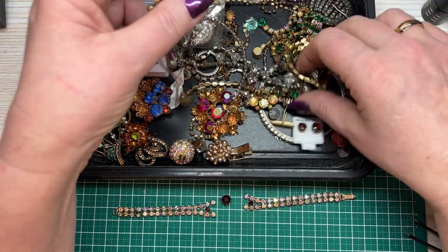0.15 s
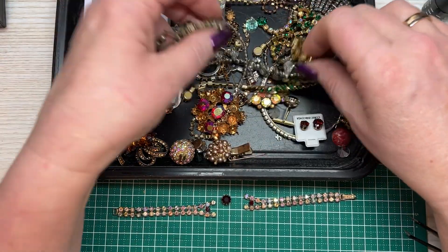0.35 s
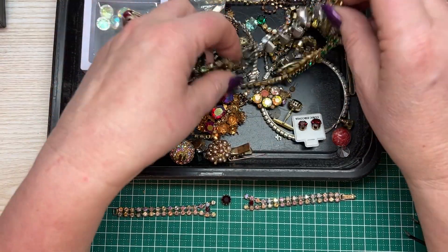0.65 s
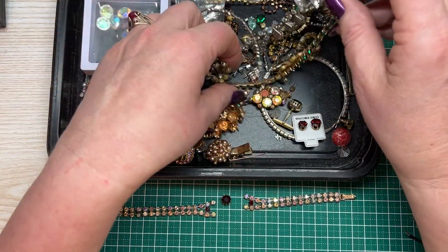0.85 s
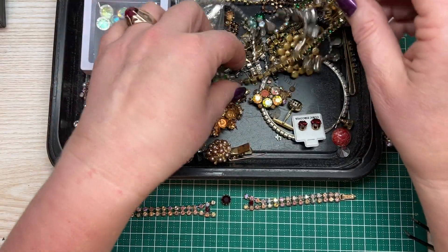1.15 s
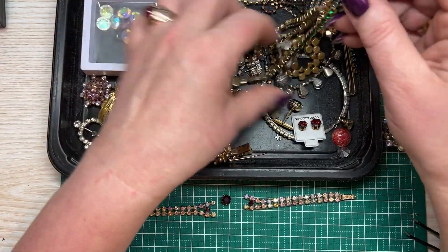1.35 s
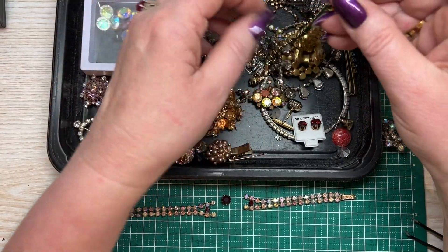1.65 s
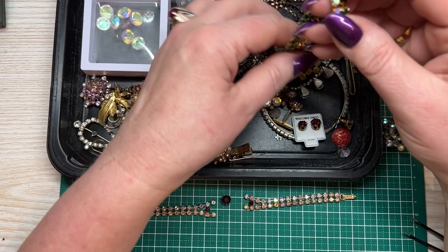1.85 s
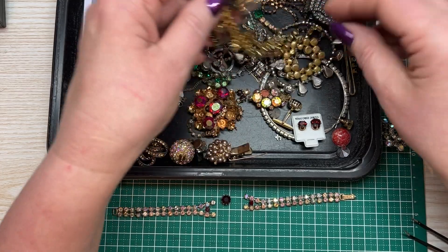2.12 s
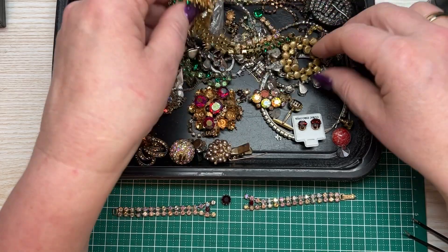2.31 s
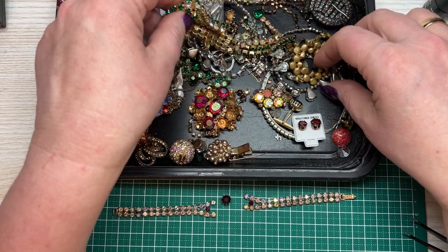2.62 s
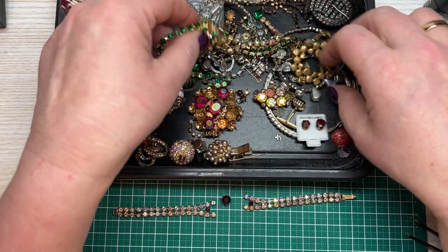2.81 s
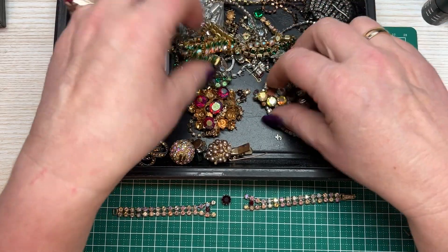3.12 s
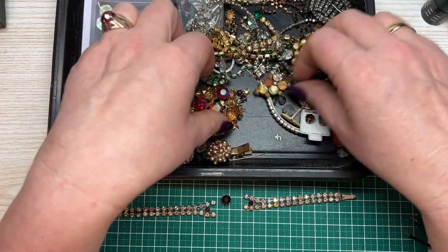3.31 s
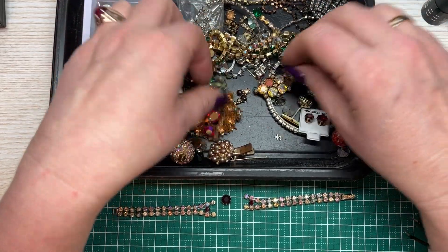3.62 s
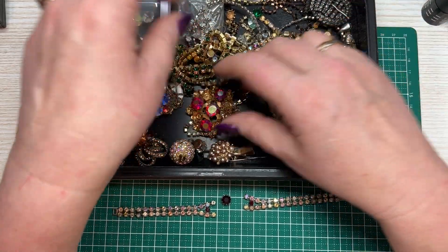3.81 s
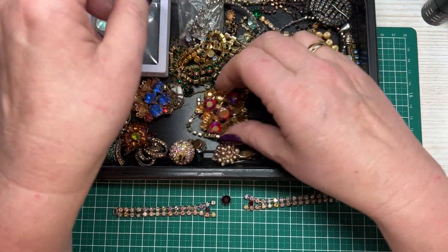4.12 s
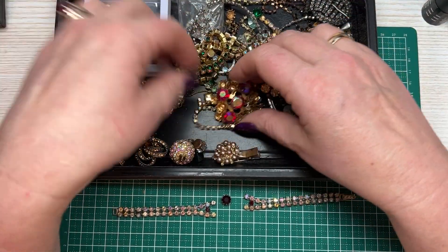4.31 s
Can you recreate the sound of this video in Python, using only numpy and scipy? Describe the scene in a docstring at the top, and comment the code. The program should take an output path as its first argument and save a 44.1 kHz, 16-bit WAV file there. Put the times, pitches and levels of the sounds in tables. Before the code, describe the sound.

Close, dry metallic rattling and clinking in uneven bursts as fingers dig through a heap of brooches, beads and fine chains indoors.

```python
"""Beads and brooches clack as two hands dig through a shallow tray of costume jewelry in a small room:
choked modal impacts sound clear contacts, and random collisions through similar impacts sound the heap.
Chains trickle as denser, brighter collisions, a fine strand as sparser, still brighter ones, and charms
jingle as short sine modes. The tray thuds on the table as a bank of low modes. Two close microphone ports
hear the direct sound with a phase difference, over a short diffuse tail and faint steady noise."""
import sys
import numpy as np
from scipy import signal
from scipy.fft import rfft, irfft, next_fast_len
from scipy.io import wavfile

SR = 44100
rng = np.random.default_rng(int(sys.argv[2]) if len(sys.argv) > 2 else 0)


def wrap_up_sound(samples):
    """Save the sound to the file named by the first command line argument, as 16-bit audio."""
    columns = np.atleast_2d(samples).T
    # keep every value between -1 and 1, then stretch to whole-number steps
    tamed = np.clip(columns, -1, 1)
    steps = np.round(tamed * 32767).astype(np.int16)
    wavfile.write(sys.argv[1], SR, steps)


N = 196641
TIME = np.arange(N) / SR

# Steady noise of the still room: (frequency [Hz], relative spectral level [dB])
AIR_SPECTRUM = [(18, -29), (30, 25), (1070, 16), (2680, -30), (3580, -48), (6050, -72), (7670, -26),
                (10200, -80), (16000, -23)]
# Phase lead of the left port, negative where it lags: (frequency [Hz], phase before bass taper [rad])
PORT_PHASE_LEAD = [(0, 0), (860, -0.7), (1290, -0.8), (2760, 2.7), (3620, 0.9), (4480, 1.7), (5340, 2.1),
                   (7670, 6.0), (8530, 6.7), (9820, 9.1), (10900, 9.8), (12200, 12.5), (13000, 12.8),
                   (14600, 15.6), (15700, 16.5), (16400, 16.1)]
# Modes of the loaded tray on the table:
# (nominal frequency [Hz], nominal relative level [dB], 60 dB decay time [s])
TRAY_MODES = [(63.5, 6.5, 0.29), (76, -5, 0.15), (121.9, 5, 0.17), (151.5, -1.5, 0.12), (169, 3, 0.076),
              (222, -2.5, 0.12), (253, -4.5, 0.056), (322, -3.5, 0.072), (377.7, 1.5, 0.043),
              (426, 5, 0.06), (494, 4, 0.03), (703, 12, 0.03)]
# Pushes and drops that reach the tray: (time [s], relative level [dB], centre of the thud [Hz])
TRAY_KNOCKS = [(0.064, -45.5, 230), (0.095, -51, 215), (0.191, -48.5, 74), (0.452, -44.5, 264),
               (0.819, -50.5, 233), (0.852, -54, 308), (1.202, -46, 266), (1.237, -51, 320),
               (1.319, -45, 340), (2.226, -55.5, 104), (2.329, -51.5, 284), (2.427, -52.5, 252),
               (3.06, -39.5, 240), (3.125, -47.5, 308), (3.207, -46.5, 300), (3.277, -37.5, 246),
               (3.443, -47.5, 186), (3.544, -49, 160), (3.611, -49.5, 168), (3.67, -39, 198),
               (3.7, -38.5, 180), (3.732, -39.5, 153), (3.869, -42.5, 200), (3.993, -46.5, 207),
               (4.089, -37.5, 96), (4.154, -47, 72), (4.21, -40.5, 201), (4.263, -36.5, 115),
               (4.296, -37.5, 93), (4.335, -40.5, 58), (4.406, -42.5, 186)]
# Small charms that jingle while a strand is pulled:
# (start [s], end [s], nominal pitch [Hz], nominal level [dB])
CHARM_JINGLES = [(0.322, 0.484, 3560, -52), (0.326, 0.398, 10000, -55), (0.431, 0.899, 7560, -59),
                 (1.426, 1.663, 6780, -75), (1.802, 2.2, 3050, -63)]
# Colour of the very fine links: (frequency [Hz], relative spectral level [dB])
FINE_LINK_COLOUR = [(4000, -29), (7500, -18), (11500, 2.5), (13000, 5), (15700, 2.5)]
# Colour of contact between thin metal parts: (frequency [Hz], relative spectral level [dB])
THIN_METAL_COLOUR = [(1500, -10.5), (4000, -6), (5800, -3), (6500, -2), (7100, 1.5), (8000, -1),
                     (9000, -3.5), (11000, -3.5), (12700, -7), (13600, -7), (15700, 2)]
# Colour of contact between heavy pieces: (frequency [Hz], relative spectral level [dB])
HEAVY_PIECE_COLOUR = [(250, -15.5), (420, -3), (600, -14), (900, -0.5), (1200, -1.5), (1950, 1.5),
                      (2500, 1), (3200, 1), (4300, -8.5), (5600, -3), (8000, -23.5), (16000, -21)]
# Pushes and pulls of the fingers through the heap: (start [s], length [s],
# relative levels of tray rumble [dB], beads and brooches [dB], chain links [dB])
FINGER_DIGS = [(0.035, 0.15, -44.5, -41, -39), (0.18, 0.17, -55.5, -55, -50), (0.339, 0.17, -51, -49, -45),
               (0.523, 0.24, -62, -61, -49.5), (0.65, 0.16, -60, -54.5, -54.5),
               (0.81, 0.078, -51, -54, -53.5), (0.973, 0.12, -67, -63.5, -59),
               (1.054, 0.11, -56, -47.5, -44), (1.192, 0.093, -56, -43, -38.5),
               (1.32, 0.303, -56, -52, -50.5), (1.689, 0.024, -58, -64, -57), (1.776, 0.14, -62, -64, -51),
               (1.937, 0.26, -81, -56, -52), (2.303, 0.32, -57, -53, -61), (2.661, 0.23, -61.5, -61, -65),
               (2.803, 0.066, -57, -49, -51), (2.955, 0.0082, -84, -60, -44.5),
               (3.029, 0.12, -52, -46.5, -42.5), (3.195, 0.13, -48, -47.5, -45.5),
               (3.348, 0.12, -46, -49.5, -51), (3.528, 0.18, -49.5, -56.5, -45.5),
               (3.656, 0.051, -38, -54.5, -41), (3.849, 0.062, -46.5, -55, -46.5),
               (3.958, 0.08, -47.5, -52.5, -46.5), (4.104, 0.063, -53, -58, -51.5),
               (4.198, 0.11, -45.5, -53, -51.5), (4.368, 0.033, -48.5, -51.5, -45)]
# Hands merely holding the heap, relative levels:
# (tray rumble [dB], beads and brooches [dB], chain links [dB])
HOLDING_LEVELS = [-76.5, -75, -70.5]
# Clear single contacts: (time [s], relative level of heavy clack [dB], relative level of thin tick [dB],
# decay time constant [ms], strongest mode [Hz])
CLEAR_CONTACTS = [(0.029, -41, -43, 4.3, 2830), (0.0481, -39, -45, 2.9, 3250),
                  (0.0827, -59, -34, 3.6, 2810), (0.0938, -47, -38, 3.5, 1210),
                  (0.1395, -34.5, -31.5, 1.1, 2420), (0.283, -57, -47, 2.3, 3750),
                  (0.2941, -62, -41, 1, 3680), (0.3393, -42, -38.5, 10, 3650),
                  (0.3728, -37, -34.5, 2.4, 3600), (0.406, -47, -48, 1.4, 3400),
                  (0.449, -40.5, -38.5, 4.1, 2950), (0.4725, -42, -37, 0.84, 3000),
                  (0.4977, -47, -41, 2.7, 2970), (0.5808, -55, -41.5, 1.1, 5190),
                  (0.7071, -46.5, -43, 2.9, 3260), (1.0504, -38.5, -36.5, 6, 2050),
                  (1.072, -28, -29.5, 2.4, 1830), (1.0796, -37, -29.5, 0.91, 4270),
                  (1.0919, -36.5, -47, 2.7, 4330), (1.109, -43, -49, 1.3, 1820),
                  (1.1214, -33, -28.5, 4.7, 3100), (1.169, -67, -47, 0.69, 3000),
                  (1.199, -39, -48, 1.7, 5260), (1.2055, -35.5, -29.5, 2.5, 3500),
                  (1.224, -37.5, -24, 2.2, 2190), (1.253, -40, -33, 0.61, 3450),
                  (1.2753, -40, -37, 6, 3440), (1.3195, -32.5, -38, 5.7, 3120),
                  (1.3403, -38, -37, 3.3, 3140), (1.386, -56, -37, 3.3, 2660),
                  (1.4042, -52, -37.5, 4.6, 3070), (1.425, -45, -47, 4.1, 3200),
                  (1.46, -46, -40.5, 1.2, 2980), (1.478, -41, -45, 2.9, 2450),
                  (1.541, -51, -38.5, 2.1, 2120), (1.6008, -34, -41, 3.2, 2360),
                  (1.6902, -47, -48.5, 3.9, 2880), (1.76, -52, -51, 8.7, 3280),
                  (1.7924, -53, -44.5, 5, 2760), (1.8201, -38, -46, 0.6, 2980),
                  (1.8329, -44.5, -52, 4.5, 3020), (1.896, -53, -44, 1.4, 5600),
                  (1.9888, -43.5, -54, 2.7, 2610), (2.0494, -45, -65, 3.7, 3170),
                  (2.1504, -43.5, -40.5, 1.1, 1760), (2.186, -65, -47, 4.6, 2310),
                  (2.282, -50, -44, 1.2, 2170), (2.292, -53, -58, 2, 2090), (2.308, -72, -48, 0.8, 2090),
                  (2.3273, -44.5, -37, 1.3, 2400), (2.428, -35.5, -41, 0.62, 3100),
                  (2.4463, -44.5, -48, 2.6, 1740), (2.494, -43, -58, 1.6, 3200),
                  (2.5391, -37, -60, 0.79, 1860), (2.8203, -46, -52, 3, 1250),
                  (2.8552, -56, -40.5, 1.1, 3100), (2.8709, -39.5, -58, 0.98, 3120),
                  (2.951, -72, -53.5, 2, 3080), (2.9704, -35, -43, 1.4, 3230), (3.047, -35, -33, 4.2, 3020),
                  (3.0592, -31.5, -30, 1.6, 3140), (3.0727, -33.5, -22.5, 1.7, 2100),
                  (3.1047, -41, -34.5, 2.2, 2980), (3.1246, -39, -31, 0.9, 3600),
                  (3.1831, -41.5, -44.5, 1.2, 2560), (3.2039, -38, -36.5, 2.1, 2750),
                  (3.246, -39, -37.5, 2.7, 3060), (3.2719, -36.5, -29.5, 3.6, 2630),
                  (3.2872, -33, -24, 1.7, 3000), (3.2946, -29.5, -29, 1.7, 3120),
                  (3.3733, -46, -41.5, 12, 2120), (3.398, -41, -48, 3, 2310), (3.43, -30, -34.5, 4.2, 1850),
                  (3.4542, -56, -41, 1.4, 1870), (3.4953, -47, -44.5, 0.71, 3470),
                  (3.601, -41.5, -44, 5.1, 4640), (3.6162, -44, -60, 4.8, 1280),
                  (3.666, -38.5, -35, 3.6, 5240), (3.6953, -41.5, -31, 0.55, 2780),
                  (3.7225, -46, -42, 5.3, 4970), (3.8595, -48, -50, 2.6, 1620),
                  (3.8717, -43, -43, 2.2, 5060), (4.018, -49, -40, 1.1, 4540),
                  (4.0319, -36.5, -31, 2.4, 4620), (4.109, -38.5, -28.5, 1.4, 3420),
                  (4.2656, -42, -40.5, 3.4, 2800), (4.2731, -40, -49, 1.6, 1170),
                  (4.299, -40, -44, 12, 1200), (4.4435, -52, -37.5, 0.89, 3320)]

ROOM_T60_S = 0.16
CUTOFF_HZ = 15900
PING_DB, PING_T60_S = -9.5, 0.028  # free modes, relative to the choked ones
ECHO_DB, ECHO_DECAY_S = -9.5, 0.0029  # reflections off hands and tray walls
# the heap gives way, loosens under the fingers, then settles
DIG_ATTACK_S, DIG_SETTLE_S, DIG_SAG_DB_PER_S = 0.013, 0.023, 16
# the strand's level is relative to the force on the other chains
STRAND_FROM_S, STRAND_TO_S, STRAND_FADE_S, STRAND_DB = 0.057, 2.6, 0.19, -3.5


def from_db(db):
    """Logarithmic level: decibels to amplitude gain."""
    return 10 ** (np.asarray(db) / 20)


def unit_energy(x):
    """Energy normalization: scale so that the squares sum to one."""
    return x / np.sqrt(np.sum(x ** 2) + 1e-20)


def at_hz(points, hz):
    """Spectral interpolation: gain from a table, linear in decibels over log frequency."""
    points = np.array(points)
    return from_db(np.interp(np.log(hz + 1), np.log(points[:, 0]), points[:, 1]))


def add(out, s, sound):
    """Linear superposition: mix a sound in at time s, or at zero if s is negative."""
    at = max(round(s * SR), 0)
    room_left = out[..., at:at + sound.shape[-1]]
    room_left += sound[..., :room_left.shape[-1]]


def place(sound, pan_db):
    """Interchannel level difference: left and right of a sound a little off centre."""
    return sound * from_db([[pan_db / 2], [-pan_db / 2]])


def ring(hz, t60, size):
    """Damped oscillation: a struck mode is a sine with exponential decay."""
    t = TIME[:size]
    return np.sin(2 * np.pi * hz * t) * from_db(-60 * t / t60)


def collisions(per_s, spread_db):
    """Poisson-like impulses: random clicks of uneven size and either sign, mean power 1."""
    born = rng.random(N) < per_s / SR
    sizes = from_db(spread_db * np.minimum(rng.exponential(1, N), 3))
    signs = rng.choice([-1, 1], N)
    return np.sqrt(N) * unit_energy(born * sizes * signs)


def air(level_db):
    """Partly correlated noise: a faint steady background, partly shared by both ports."""
    white = rng.standard_normal(N) + 1.9 * rng.standard_normal((2, N))
    size = next_fast_len(N)
    gain = at_hz(AIR_SPECTRUM, np.fft.rfftfreq(size, 1 / SR))
    noise = irfft(rfft(white, size) * gain, size)[:, :N]
    return from_db(level_db) * np.sqrt(2 * N) * unit_energy(noise)


def room(x, wet_db, wall_hz, size=16000):
    """Diffuse reverberation: a duller tail, alike at both ports in its long waves only."""
    t = TIME[:size]
    envelope = (1 - np.exp(-t / 0.00065)) * from_db(-60 * t / ROOM_T60_S)
    mid, side = rng.standard_normal((2, size)) * envelope
    side = signal.sosfilt(signal.butter(1, 250, "high", fs=SR, output="sos"), side)
    walls = signal.butter(1, [220, wall_hz], "band", fs=SR, output="sos")
    tail = unit_energy(signal.sosfilt(walls, np.array([mid + side, mid - side])))
    return from_db(wet_db) * signal.fftconvolve(x, tail, axes=1)[:, :N]


def ports(x):
    """Interchannel phase: the ports differ by a frequency-dependent lead that vanishes in the bass."""
    size = next_fast_len(N + 2048)
    hz = np.fft.rfftfreq(size, 1 / SR)
    bass_taper = np.minimum(hz / 800, 1) ** 2
    lead = np.interp(hz, *np.transpose(PORT_PHASE_LEAD)) * bass_taper
    turn = np.exp(0.5j * lead * np.array([[1], [-1]]))  # half the lead on each side
    return irfft(rfft(x, size) * turn, size)[:, :N]


def tray(centre_hz, octaves, size=10000):
    """Modal excitation: the softness of a push picks the modes around its centre; energy 1."""
    hz, level_db, t60 = np.array(TRAY_MODES).T[:, :, None]
    hz = hz * (1 + rng.normal(0, 0.054, hz.shape))  # the shifting load detunes the tray
    selection = 1 / (1 + (np.log2(hz / centre_hz) / octaves) ** 2) ** 2
    strength = from_db(level_db + rng.normal(0, 1.9, hz.shape)) * selection
    modes = rng.choice([-1, 1], hz.shape) * strength * ring(hz, t60, size)
    onset = 1 - np.exp(-TIME[:size] / 0.00089)
    return unit_energy(modes.sum(axis=0) * onset)


def thuds(rumble, knock_db, jostle_db, count=8):
    """Impulse response: the tray answers single knocks and its jostling load with several responses."""
    bumps = collisions(per_s=240, spread_db=3.0) * rumble * from_db(jostle_db)  # soft nudges
    spot = rng.integers(0, count, N)
    out = np.zeros(N)
    for k in range(count):
        out += signal.oaconvolve(bumps * (spot == k), tray(284, octaves=1.44))[:N]
    for s, level_db, centre_hz in TRAY_KNOCKS:
        add(out, s, from_db(level_db + knock_db) * tray(centre_hz, octaves=0.89))
    return out


def charms(per_s, t60, detune, size=2560):
    """Near-unison modes: nearly alike charms tap at random times, each with a short ring."""
    out = np.zeros((2, N))
    for start, end, nominal_hz, level_db in CHARM_JINGLES:
        taps = max(round((end - start) * per_s), 0)
        for s in rng.uniform(start, max(end, start), taps):
            hz = nominal_hz * (1 + rng.normal(0, detune))
            tap = unit_energy(ring(hz, t60, size)) * np.sqrt(SR / per_s)
            gain = from_db(level_db + rng.normal(0, 0.78))
            add(out, s, place(gain * tap, rng.normal(0, 1.1)))
    return out


def piece(colour, decay_ms, rise_ms, uneven_db=5, size=2560, count=4):
    """Damped impact, energy 1: crowded modes choked by the heap, a few free ones, and quick echoes."""
    t, hz = TIME[:size], np.fft.rfftfreq(size, 1 / SR)
    ms = 1000 * t
    # every shape has humps and hollows of its own in its spectrum
    marks = np.linspace(0, SR / 2, 64)
    shape = from_db(uneven_db * np.interp(hz, marks, rng.standard_normal(len(marks))))
    gain = at_hz(colour, hz) * shape * hz / np.hypot(hz, 200)
    crowded, echoes = irfft(gain * rfft(rng.standard_normal((2, size))))
    # loose parts land one after another, so the contact takes a moment to build
    build = 1 - np.exp(-(ms / rise_ms) ** 2)
    choked = unit_energy(crowded * build * np.exp(-ms / decay_ms))
    echoes = unit_energy(echoes * (ms > 2) * np.exp(-t / ECHO_DECAY_S))
    free_hz = rng.uniform(1300, 15000, (count, 1))
    free_modes = at_hz(colour, free_hz) * ring(free_hz, PING_T60_S, size)
    free = unit_energy(build * np.sum(free_modes, axis=0))
    return unit_energy(choked + from_db(ECHO_DB) * echoes + from_db(PING_DB) * free)


def tumble(clicks, colour, decay_ms, rise_ms, count=32):
    """Convolution with impact responses: clicks are dealt out to different pieces across the tray."""
    dealt, out = rng.integers(0, count, N), np.zeros((2, N))
    for k in range(count):
        impact = piece(colour, decay_ms * rng.uniform(0.55, 2.13), rise_ms)
        struck = signal.oaconvolve(clicks * (dealt == k), impact)[:N]
        out += place(struck, rng.normal(0, 1.36))
    return out


def digging():
    """Power addition of swelling, easing digs: gains of tray rumble, beads and chain links."""
    power, t = from_db(HOLDING_LEVELS)[:, None] ** 2 * np.ones(N), TIME[:SR]
    swell = np.minimum(t / DIG_ATTACK_S, 1) * from_db(-DIG_SAG_DB_PER_S * t)
    for start, length, *levels_db in FINGER_DIGS:
        settle = np.exp(-np.maximum(t - length, 0) / DIG_SETTLE_S)
        add(power, start, (from_db(levels_db)[:, None] * swell * settle) ** 2)
    return np.sqrt(power)


def skids(before_s, after_s):
    """Frictional power around impact: slides before and jostling after; gains of heavy and thin parts."""
    power, half_s = np.zeros((2, N)), 0.04
    t = TIME[:round(2 * half_s * SR)] - half_s
    swell = np.exp(-np.where(t < 0, -t / before_s, t / after_s))
    for s, heavy_db, thin_db, *_ in CLEAR_CONTACTS:
        add(power, s - half_s, from_db([[heavy_db], [thin_db]]) ** 2 * swell)
    return np.sqrt(power)


def strand(link_force):
    """Granular collision: tiny links of a hanging strand shimmer with every move of the chains."""
    edge_s = np.minimum(TIME - STRAND_FROM_S, STRAND_TO_S - TIME)
    hanging = np.clip(edge_s / STRAND_FADE_S, 0, 1)
    clicks = collisions(per_s=700, spread_db=10.0) * link_force * hanging * from_db(STRAND_DB)
    return tumble(clicks, FINE_LINK_COLOUR, decay_ms=1.3, rise_ms=0.19, count=12)


def chains(link_force):
    """Granular collision: dense link impacts merge into a bright trickle."""
    clicks = collisions(per_s=1100, spread_db=6.5) * link_force
    return tumble(clicks, THIN_METAL_COLOUR, decay_ms=0.86, rise_ms=0.53)


def beads(bead_force):
    """Granular collision: beads and brooches tumble with longer, lower impacts than the chains."""
    clicks = collisions(per_s=800, spread_db=4.0) * bead_force
    return tumble(clicks, HEAVY_PIECE_COLOUR, decay_ms=1.54, rise_ms=0.41)


def clinks(clack_db, tick_db, rise_share, lead_s, mode_db, mode_t60):
    """Modal superposition: a heavy piece, its strongest mode and thin fittings sound together."""
    out = np.zeros((2, N))
    for s, heavy_db, thin_db, decay_ms, mode_hz in CLEAR_CONTACTS:
        rise_ms = rise_share * decay_ms
        body = piece(HEAVY_PIECE_COLOUR, decay_ms, rise_ms)
        mode = unit_energy(ring(mode_hz, mode_t60, len(body)))
        clack = from_db(heavy_db + clack_db) * unit_energy(body + from_db(mode_db) * mode)
        tick = from_db(thin_db + tick_db) * piece(THIN_METAL_COLOUR, decay_ms, rise_ms)
        add(out, s - lead_s, place(clack + tick, rng.normal(0, 3.3)))
    return out


def scene():
    """Superposition of sources: common hand forces drive the heap, then ports, room and air join."""
    rumble, bead_stir, link_stir = digging()
    bead_skid, link_skid = from_db(-9.5) * skids(before_s=0.0021, after_s=0.0067)
    bead_force = np.hypot(bead_stir, bead_skid)  # independent forces add in power
    link_force = np.hypot(link_stir, link_skid)
    direct = thuds(rumble, knock_db=29.0, jostle_db=-3.5)
    direct = direct + charms(per_s=28, t60=0.013, detune=0.028)
    direct += strand(link_force) + chains(link_force) + beads(bead_force)
    direct += clinks(clack_db=23, tick_db=23.5, rise_share=0.33, lead_s=0.00022,
                     mode_db=-3.5, mode_t60=0.022)
    return ports(direct) + room(direct, wet_db=-10, wall_hz=3320) + air(level_db=-71.5)


def record(dry):
    """Band limiting: the deepest bass is rolled off and the top is cut steeply."""
    lean = signal.sosfilt(signal.butter(2, 40, "high", fs=SR, output="sos"), dry)
    # 0.2 dB passband ripple, 80 dB stopband attenuation
    return signal.sosfilt(signal.ellip(10, 0.2, 80, CUTOFF_HZ, fs=SR, output="sos"), lean)


dry = scene()
out = record(dry)
wrap_up_sound(out)
```